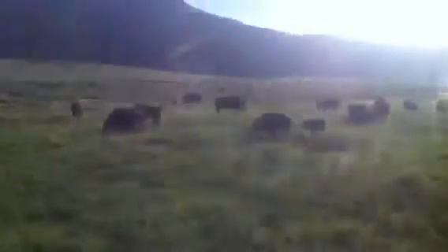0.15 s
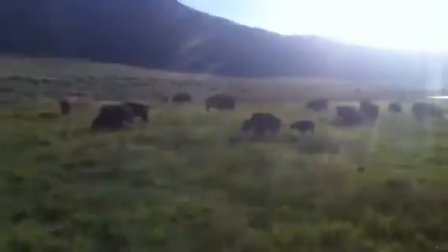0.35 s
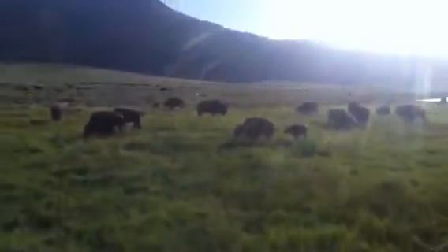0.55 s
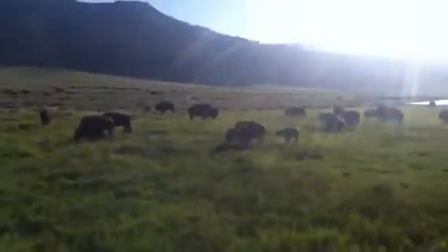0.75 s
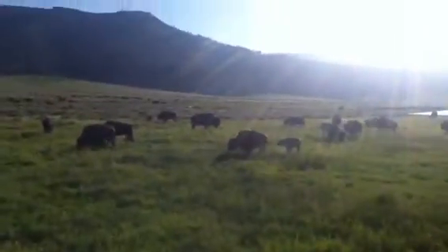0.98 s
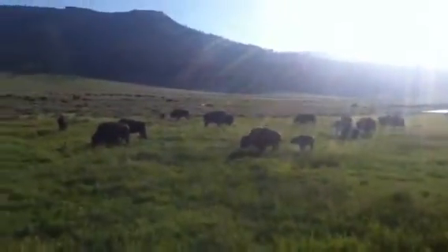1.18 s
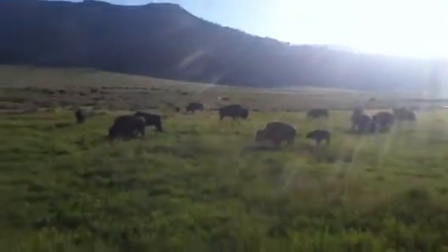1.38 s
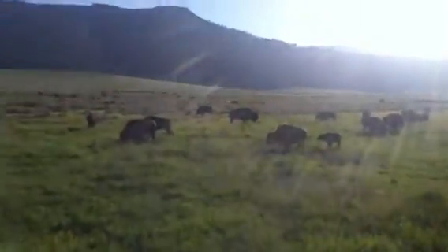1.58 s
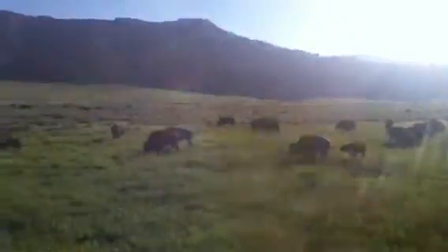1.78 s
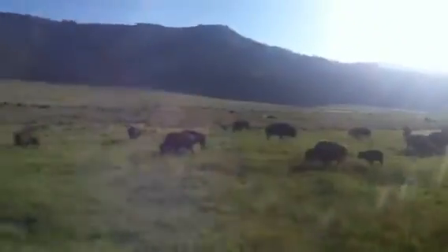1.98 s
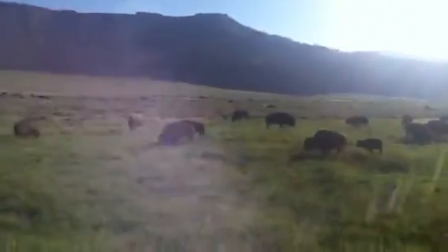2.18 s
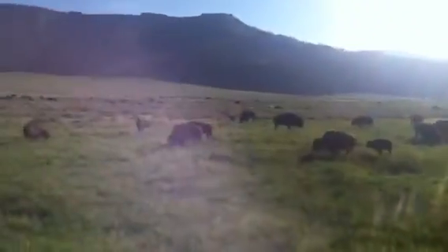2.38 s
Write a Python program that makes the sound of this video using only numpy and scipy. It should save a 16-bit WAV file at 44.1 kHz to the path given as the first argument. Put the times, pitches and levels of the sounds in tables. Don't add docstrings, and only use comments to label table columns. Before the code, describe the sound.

A bison gives one short, low, rough grunt on a windy, open grassy plain.

```python
import sys
import numpy as np
from scipy import signal
from scipy.fft import rfft, irfft
from scipy.io import wavfile
from scipy.ndimage import uniform_filter1d

SR = 44100
rng = np.random.default_rng(int(sys.argv[2]) if len(sys.argv) > 2 else 0)


def generate_wav(sig):
    pcm = np.round(np.clip(np.atleast_2d(sig).T, -1, 1) * 32767).astype(np.int16)
    wavfile.write(sys.argv[1], SR, pcm)


def undo_db(level):
    steps = np.asarray(level, float) / 20
    return 10 ** steps


N = 108045


def evened(x):
    return x / np.sqrt(np.mean(x ** 2) + 1e-20)


def curve(table, column=1):
    rows = np.array(table, float)
    return np.interp(np.arange(N) / SR, rows[:, 0], rows[:, column])


def add(mix, start_s, sound):
    part = mix[round(start_s * SR):][:len(sound)]
    part += sound[:len(part)]


def smoothed_twice(x, size):
    return uniform_filter1d(uniform_filter1d(x, size=size), size=size)


def high_pass(x, order, hz):
    return signal.sosfilt(signal.butter(order, hz, "high", fs=SR, output="sos"), x)


def resonate(x, hz, width_hz):
    turn = np.exp(2j * np.pi * np.cumsum(hz * np.ones(len(x))) / SR)
    r = np.exp(-np.pi * width_hz / SR)
    for _ in range(2):
        x = 2 * (turn * signal.lfilter([1 - r], [1, -r], x / turn)).real
    return x


def pressure_swing(hz, cycles, sag=0, tail=1):
    u = np.arange(-2 * SR // hz, 2 * SR // hz) * hz / SR
    envelope = np.exp(-(u / cycles / np.where(u > 0, tail, 1)) ** 2)
    return np.cos(2 * np.pi * (u - sag * u ** 2)) * envelope


def electronic_whine():
    whine_hz, whine_db = 14993, -79
    return np.sqrt(2) * undo_db(whine_db) * np.sin(2 * np.pi * whine_hz * np.arange(N) / SR)


def wind_hiss():
    # f/Hz, level/dB per Hz
    wind_colour = [(20, -16.5), (80, -2), (170, 1), (300, -7), (900, -12), (3500, -21.5), (9000, -27.5),
                   (15700, -36.5)]
    # t/s, level/dB
    lull = [
        (0, 1),
        (1.6, 1.48),
        (1.9, 0),
        (2.45, -0.5),
    ]
    hiss_db, swell_db, patch_db, flicker_db = -45.5, .3, 1.2, .7
    frames, bin_hz = N // 128 + 6, np.fft.rfftfreq(512, 1 / SR)
    real, imag, patches = rng.standard_normal((frames, 257, 3)).T
    patches = uniform_filter1d(patches, size=8, axis=0)
    patches = evened(uniform_filter1d(patches, size=20, axis=1))
    slow, quick = rng.standard_normal((frames, 2)).T
    shared_db = swell_db * evened(uniform_filter1d(slow, size=60))
    shared_db = shared_db + flicker_db * evened(uniform_filter1d(quick, size=5))
    treble_share = (bin_hz / (bin_hz + 1500))[:, None]
    spectra = (real + 1j * imag) * undo_db(patch_db * patches + shared_db * treble_share)
    white = signal.istft(spectra, nperseg=512, noverlap=384)[1][:N]
    colour_hz, colour_db = np.transpose(wind_colour)
    log_hz = np.log(np.fft.rfftfreq(N, 1 / SR) + 1)
    colour = undo_db(np.interp(log_hz, np.log(colour_hz), colour_db))
    return undo_db(hiss_db + curve(lull)) * evened(irfft(rfft(white) * colour, N))


def wind_buffets():
    # t/s, buffet level/dB
    breeze = [(0, -54), (.3, -49), (.55, -49), (.8, -54), (.95, -49), (1.2, -50), (1.45, -51), (1.7, -54),
              (1.9, -57), (2.45, -60)]
    buffets_per_s, spread_db = 140, 2
    strike = rng.random(N) < buffets_per_s / SR
    size = undo_db(spread_db * rng.exponential(1, N)) * rng.choice([-1, 1], N) * strike
    kind = rng.integers(0, 6, N)
    small = np.zeros(N)
    for k, hz in enumerate(np.geomspace(55, 150, num=6)):
        small += signal.oaconvolve(size * (kind == k), pressure_swing(hz, cycles=0.88), "same")
    return undo_db(curve(breeze)) * evened(high_pass(small, 2, 68))


def gust_thumps():
    # centre t/s, f/Hz, peak level/dB, push +1 or pull -1
    thump_table = [(.096, 120, -33, 1), (.227, 140, -27, 1), (.311, 140, -33, 1), (.341, 125, -23.5, -1),
                   (.47, 75, -26, -1), (.533, 140, -35, 1), (.562, 140, -35, -1), (.618, 140, -37, -1),
                   (.66, 110, -37, 1), (.692, 125, -33, 1), (.7195, 95, -27, -1), (.9, 110, -36, 1),
                   (.933, 115, -31, 1), (.952, 135, -27, -1), (.974, 120, -35, 1), (.994, 95, -35, -1),
                   (1.048, 90, -30, 1), (1.36, 70, -40, 1), (1.505, 70, -38, -1), (1.995, 170, -39, 1),
                   (2.2, 190, -40, -1)]
    out = np.zeros(N)
    for centre_s, hz, db, push in thump_table:
        swing = pressure_swing(hz, cycles=0.57, sag=.26, tail=1.7)
        add(out, centre_s - len(swing) / 2 / SR, np.sign(push) * undo_db(db) * swing)
    return out


def grass():
    # start t/s, length/s, centre f/Hz, width/centre, level/dB
    rustles = [(.19, .02, 9500, .3, -62), (.228, .05, 6000, .3, -63), (.317, .005, 6800, .35, -50),
               (.318, .003, 4000, .6, -53), (.318, .003, 10500, .3, -59), (.325, .045, 7200, .3, -57),
               (.357, .01, 3900, .1, -58), (.408, .012, 3500, .06, -58), (.43, .012, 5450, .08, -54),
               (.425, .02, 7800, .15, -62), (.63, .015, 5600, .15, -60), (1.53, .014, 3600, .05, -59),
               (1.556, .004, 3600, .6, -53), (1.74, .008, 3000, .3, -57), (2.193, .016, 4300, .04, -61),
               (2.387, .016, 3760, .04, -57)]
    out = np.zeros(N)
    for start_s, length_s, hz, share, db in rustles:
        noise = resonate(rng.standard_normal(4000), hz, share * hz)
        u = np.arange(4000) / SR / length_s
        add(out, start_s, undo_db(db) * evened(noise) * np.minimum(u * 10, 1) * np.exp(-u ** 2))
    squeak_s, squeak_length_s, squeak_hz, squeak_db = .322, .07, 11902, -62
    n = round(squeak_length_s * SR)
    tone = np.sin(2 * np.pi * squeak_hz * np.arange(n) / SR)
    add(out, squeak_s, np.sqrt(2) * undo_db(squeak_db) * np.hanning(n) * tone)
    return out


def fold_motion():
    # t/s, rate/Hz
    folds = [(.98, 83.3), (1.05, 85.4), (1.11, 87.4), (1.15, 90), (1.19, 86), (1.23, 84.5), (1.29, 82),
             (1.35, 74.1), (1.39, 67.5), (1.425, 66.5), (1.48, 57)]
    first_slap_cycles = 1.2
    rate_hz = curve(folds)
    t = np.arange(N) / SR
    on = (t >= folds[0][0]) & (t < folds[-1][0])
    return rate_hz, np.cumsum(rate_hz * on) / SR - first_slap_cycles, on


def chest_boom(turns, on):
    # t/s, then level/dB on multiples 2, 7/3 and 5/2 of the slap rate
    chest = [(.99, -57, -65, -62), (1.03, -36, -56, -65), (1.06, -26.5, -50, -60), (1.085, -25.5, -44, -55),
             (1.11, -38, -35, -42), (1.13, -40, -40, -48), (1.155, -29.5, -46, -48), (1.19, -33, -56, -48),
             (1.215, -34, -65, -36.5), (1.275, -36, -65, -32.5), (1.365, -35, -65, -34.5),
             (1.395, -48, -65, -32), (1.42, -50, -65, -35), (1.445, -43, -65, -44), (1.478, -50, -65, -52)]
    multiples = (2, 7 / 3, 5 / 2)
    chest_lag = (.02, .04, .08)
    rough_db = -15
    boom = np.zeros(N)
    for k, multiple in enumerate(multiples):
        tone = np.cos(2 * np.pi * multiple * (turns - chest_lag[k]))
        boom += np.sqrt(2) * undo_db(curve(chest, column=k + 1)) * tone
    wobble = evened(smoothed_twice(rng.standard_normal(N), 300))
    return on * boom * (1 + undo_db(rough_db) * wobble)


def fold_slaps(rate_hz, turns):
    # throat peak t/s, extra level/dB
    closures = [(1.019, 12), (1.033, -3), (1.044, 12), (1.069, 5), (1.079, 4), (1.09, -3), (1.101, 12.5),
                (1.148, 10.5), (1.159, -1), (1.181, 3), (1.193, 3.5), (1.217, -3), (1.228, 4.5), (1.252, 0),
                (1.313, 2.5), (1.326, -4), (1.339, 4), (1.353, -2), (1.367, 13)]
    jitter_s, shimmer_db = .0004, 2
    ring_up_s = .0018
    at = np.flatnonzero(np.diff(np.floor(turns)) > 0)
    at = at + np.round(jitter_s * SR * rng.standard_normal(len(at))).astype(int)
    size_db = shimmer_db * rng.standard_normal(len(at))
    for peak_s, extra_db in closures:
        nearest = np.argmin(abs(at / SR - peak_s))
        at[nearest], size_db[nearest] = round((peak_s - ring_up_s) * SR), extra_db
    slaps = np.zeros(N)
    slaps[at] = -np.sqrt(SR / rate_hz[at]) * undo_db(size_db)
    return slaps


def breath_puffs(turns, on):
    turbulence_db, puff_cycles = -2.5, .6
    puffs = np.exp(-(turns % 1) / puff_cycles) * rng.standard_normal(N) * on
    return 2 * puffs * undo_db(turbulence_db)


def throat_ring(drive, rate_hz, effort_db):
    # f/Hz, width/Hz, level/dB
    throat = [(458, 43, -7), (671, 153, 2.5), (952, 95, -0.5), (1149, 130, -4), (1348, 370, -15),
              (1870, 340, -15), (2525, 400, -18), (3390, 720, -25)]
    # t/s, level/dB
    lips = [
        (1, -2.5),
        (1.15, -2.5),
        (1.2, -0.5),
        (1.25, -1),
        (1.3, 1),
        (1.38, -1),
    ]
    lip_shares = (0, 1, -1, 0, 0, 0, 0, 0)
    follows, brighten = .2, .15
    sink = (rate_hz / 85) ** follows
    ring = np.zeros(N)
    for k, (hz, width_hz, db) in enumerate(throat):
        level_db = db + lip_shares[k] * curve(lips) + (hz > 1500) * brighten * effort_db
        ring += (-1) ** k * undo_db(level_db) * resonate(drive, hz * sink, width_hz)
    return high_pass(10 * ring, 4, 400)


def ground_echo(sound):
    echo_db, t60_s = -6, .12
    lag_s = np.arange(SR // 4) / SR
    tail = rng.standard_normal(len(lag_s)) * undo_db(-60 * lag_s / t60_s) * (lag_s > .003)
    return undo_db(echo_db) * signal.fftconvolve(sound, tail / np.linalg.norm(tail))[:N]


def grunt():
    # t/s, level/dB
    effort = [
        (.98, -24),
        (1.01, -10),
        (1.12, -8),
        (1.16, -4),
        (1.2, 0),
        (1.25, 1),
        (1.29, -5.5),
        (1.35, -8.5),
        (1.41, -22),
    ]
    throat_db = -43.5
    rate_hz, turns, on = fold_motion()
    effort_db = curve(effort)
    source = fold_slaps(rate_hz, turns) + breath_puffs(turns, on)
    ring = throat_ring(undo_db(effort_db + throat_db) * source, rate_hz, effort_db)
    return chest_boom(turns, on) + ring + ground_echo(ring)


def scene():
    return (wind_hiss() + wind_buffets() + gust_thumps() + grass() + grunt())[None]


def top_cut(x):
    return signal.sosfilt(signal.butter(12, 15770, fs=SR, output="sos"), x)


def record(dry):
    edge_hz = 15850
    band = signal.firwin(511, edge_hz, window=("kaiser", 9), fs=SR)[None]
    mix = signal.oaconvolve(dry + electronic_whine(), band, "same")
    return top_cut(mix)


dry = scene()
out = record(dry)
generate_wav(out)
```